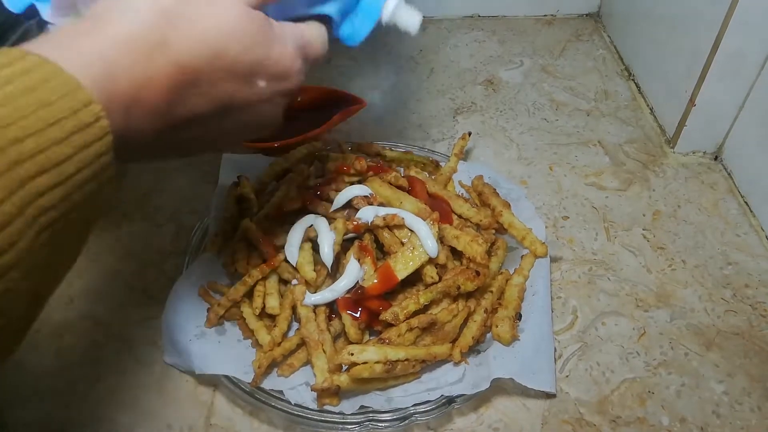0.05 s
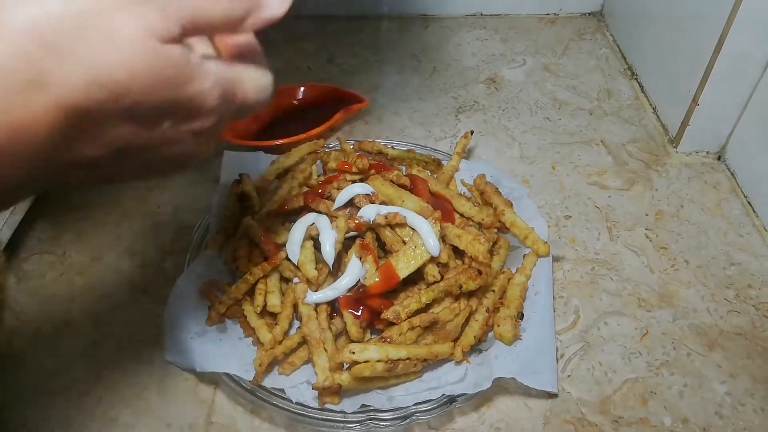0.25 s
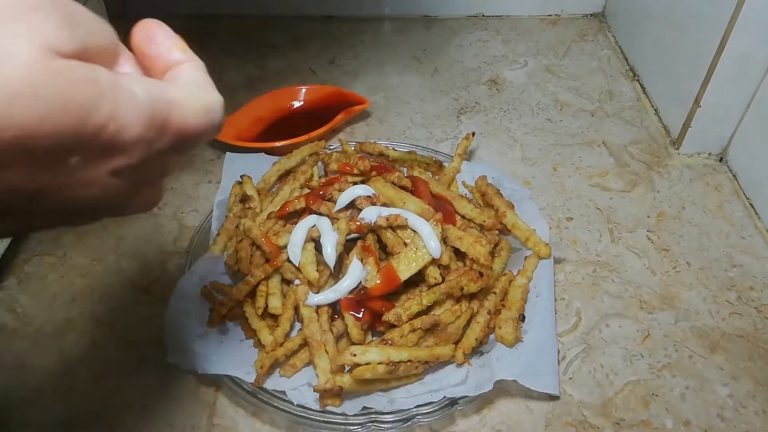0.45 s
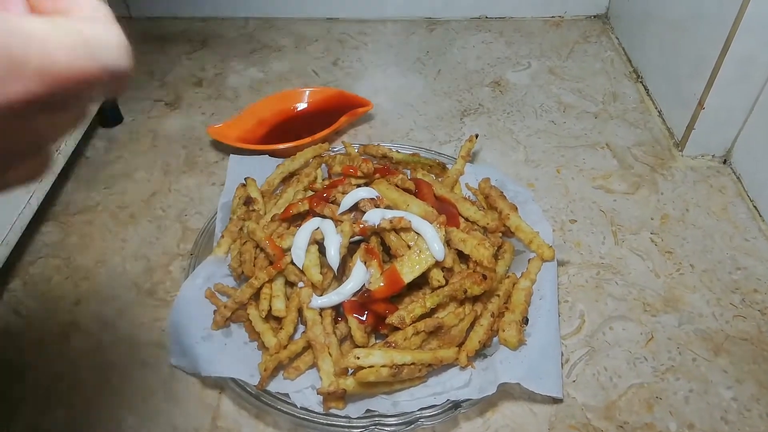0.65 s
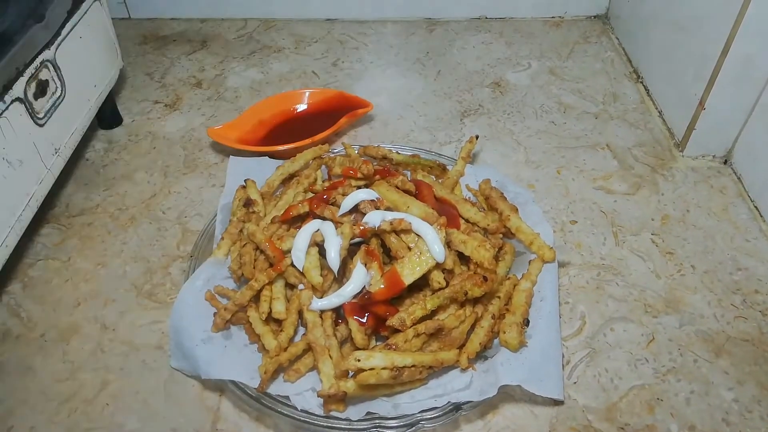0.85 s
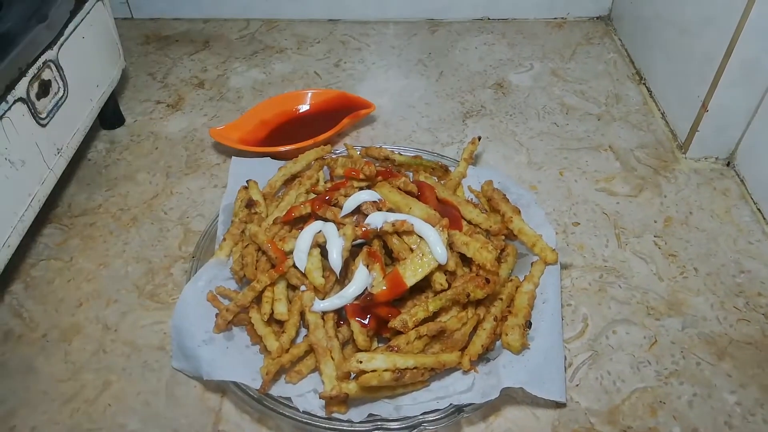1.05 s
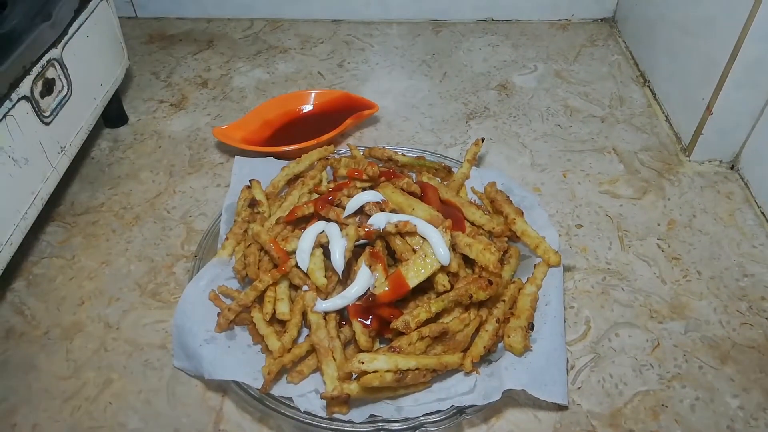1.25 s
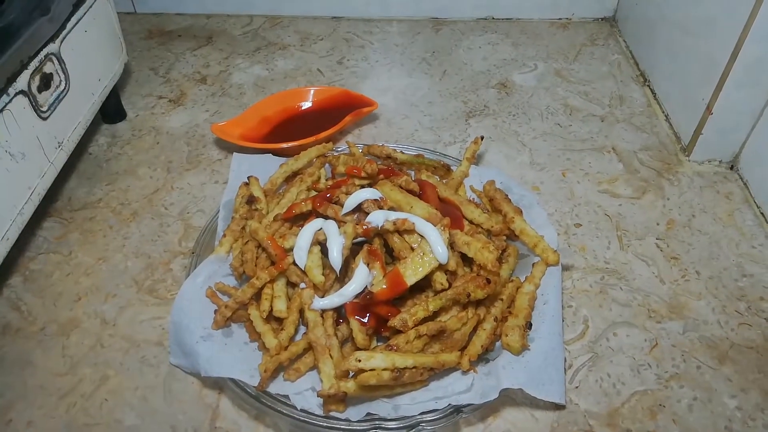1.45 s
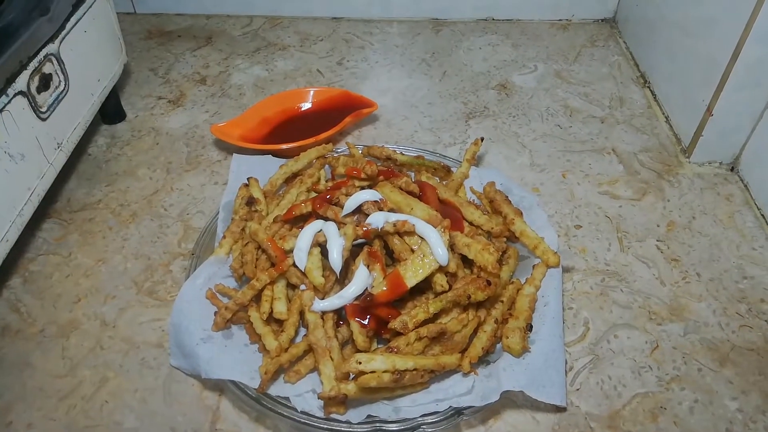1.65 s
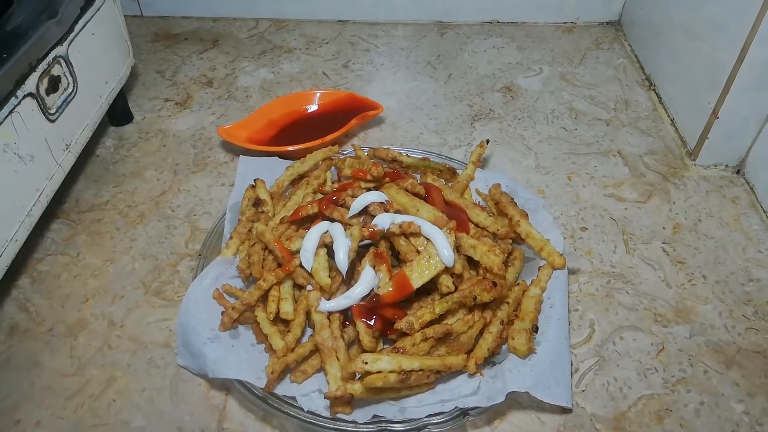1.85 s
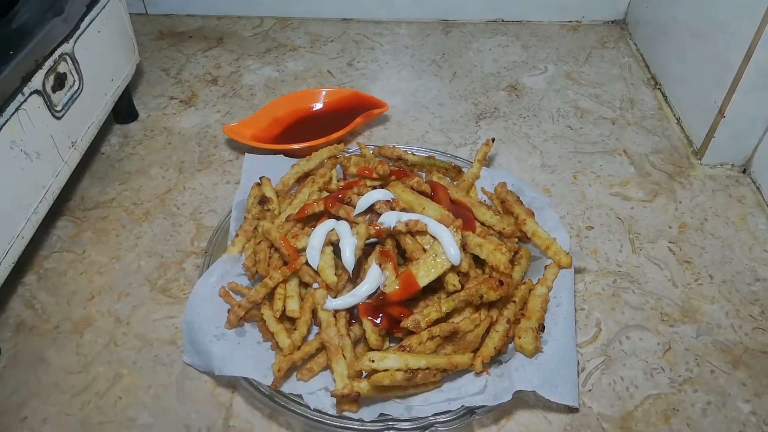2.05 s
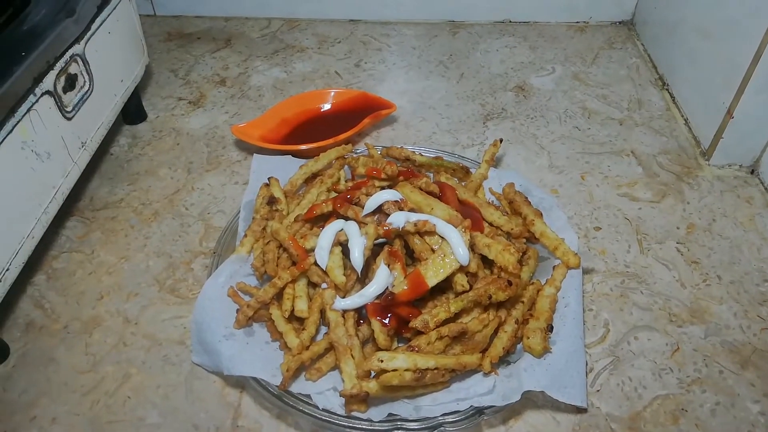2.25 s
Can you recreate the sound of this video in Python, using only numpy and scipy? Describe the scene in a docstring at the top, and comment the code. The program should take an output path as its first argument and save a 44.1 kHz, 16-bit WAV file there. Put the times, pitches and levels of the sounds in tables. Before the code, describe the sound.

A bottle is set down abruptly, knocking and booming on a hollow kitchen surface as a loose object rattles briefly. Afterwards, light ticks, crinkles and cloth brushing sit over low room tone, with dull handling thuds close on the left.

```python
"""A faint tick and a soft scuff, then a sauce bottle lands hard beside a plate in a small tiled kitchen.
It hits in a quick clatter of contacts; the hollow surface booms and a loose thing on it rocks to rest.
Afterwards come faint crinkles, clinks and cloth rustle over a low room tone,
and soft handling bumps close to the left microphone of the stereo pair."""
import sys
import numpy as np
from scipy import signal
from scipy.fft import rfft, irfft, next_fast_len
from scipy.io import wavfile

SR = 44100
rng = np.random.default_rng(int(sys.argv[2]) if len(sys.argv) > 2 else 0)


def generate_wav(sig):
    """Save sig (samples, or channels by samples) to the path in sys.argv[1] as 16-bit PCM at SR."""
    pcm = np.round(np.clip(np.atleast_2d(sig).T, -1, 1) * 32767).astype(np.int16)
    wavfile.write(sys.argv[1], SR, pcm)


N = 105840
T = np.arange(N) / SR


def from_db(db):
    """Decibels to gain."""
    return 10 ** (np.asarray(db) / 20)


def at_hz(points, hz):
    """Read a table on a log-frequency axis."""
    return np.interp(np.log(hz), np.log(np.array(points)[:, 0]), np.array(points)[:, 1])


def octaves(hz):
    """Octaves above the 3 kHz pivot of a brightness tilt, flat below 400 Hz."""
    return np.log2(np.maximum(hz, 400) / 3000)


def pan(left_minus_right_db):
    """Gains at the left and right microphones."""
    return from_db(np.array([[.5], [-.5]]) * left_minus_right_db)


def from_right(x, lag_s=0.0004695):
    """Sound from the right reaches the left microphone a little later."""
    return np.array([np.interp(T - lag_s, T, x[0]), x[1]])


def clicks(times, sizes):
    """Single-sample impulses."""
    return np.bincount((np.abs(times) * SR).astype(int), sizes, N)[:N] + 1e-18


def fade(energy, t60):
    """Energy that is put in dies away by 60 dB in t60 seconds."""
    return signal.lfilter([1], [1, -from_db(-120 / (t60 * SR))], energy)


def swell(x, seconds):
    """One-pole smoothing."""
    pole = np.exp(-1 / (seconds * SR))
    return signal.lfilter([1 - pole], [1, -pole], x)


def ring(strikes, hz, t60):
    """The motion of a damped mode driven by strikes."""
    pole = from_db(-60 / (t60 * SR)) * np.exp(2j * np.pi * hz / SR)
    return signal.lfilter([1], [1, -pole], strikes).imag


def causal(gain):
    """The minimum-phase filter with this gain, so that nothing sounds early."""
    cepstrum = irfft(np.log(gain))
    half = len(cepstrum) // 2
    return np.exp(rfft(np.r_[cepstrum[0], 2 * cepstrum[1:half], np.zeros(half)]))


# How alike the two microphones hear the kitchen: frequency_hz, correlation
MIC_LIKENESS = [(40, 0.2), (100, 1), (270, 0.99), (640, 0.46), (1400, 0.074)]
def banded_noise(colour, envelope):
    """Stereo noise of rms 1 in narrow bands, each then shaped by envelope(hz)."""
    edges = np.geomspace(22, 17000, 25)
    white = rng.standard_normal((2, 2, N))
    out = power = 0
    for k, (low, high) in enumerate(zip(edges, edges[1:])):
        band = signal.butter(2, [low, high], "band", fs=SR, output="sos")
        mid, side = signal.sosfilt(band, white[k % 2])
        hz = np.sqrt(low * high)
        alike, gain = at_hz(MIC_LIKENESS, hz), from_db(at_hz(colour, hz))
        stereo = np.sqrt(1 + alike) * mid + np.sqrt(1 - alike) * side * [[1], [-1]]
        out = out + gain * envelope(hz) * stereo
        power += 2 * gain ** 2 * (high - low) / (SR / 2)
    return out / np.sqrt(power)


# The quiet kitchen: frequency_hz, density_db
ROOM_COLOUR = [(25, -4.5), (69, 1.5), (140, -5), (523, -9.5), (1200, -20.5), (4150, -29), (15500, -29.5)]
# Its deepest rumble sits on the left microphone: frequency_hz, left_minus_right_db
ROOM_PAN = [(30, 22), (120, 0.5), (4000, 1)]
def room_tone(level_db=-52.5):
    """Steady low rumble and hiss."""
    return from_db(level_db) * banded_noise(ROOM_COLOUR, lambda hz: pan(at_hz(ROOM_PAN, hz)))


# Faint brushing, equally loud at both microphones: time_s, level_db
RUSTLE_LEVELS = [(.3, -54), (1.33, -62), (1.40, -53), (1.54, -53), (1.58, -45.5), (1.63, -56.5),
                 (1.96, -56), (2.03, -41.5), (2.065, -43.5), (2.11, -59)]
# Its colour: frequency_hz, density_db
RUSTLE_COLOUR = [(100, -40), (900, 8), (3000, 1.5), (4100, 7), (5000, 2), (16000, -1)]
def rustle(grain_db=0.51):
    """Cloth brushes softly, with a fine uneven grain."""
    grain = swell(rng.standard_normal(N), .003)
    level = from_db(np.interp(T, *np.transpose(RUSTLE_LEVELS)) + grain_db * grain / grain.std())
    return banded_noise(RUSTLE_COLOUR, lambda hz: level)


# Handling, close to the left microphone: start_s, level_db, pitch_hz
BUMPS = [(1.076, -33, 176), (1.125, -39, 131), (1.407, -37.5, 143), (1.719, -39, 238), (1.806, -34, 46.5),
         (1.821, -30.5, 150), (2.388, -34, 140)]
def bumps(t60_cycles=3.44, left_minus_right_db=23.5):
    """Dull thuds, each a low mode that dies within a few cycles."""
    thuds = sum(from_db(db) * ring(clicks([s], [1]), hz, t60_cycles / hz) for s, db, hz in BUMPS)
    return swell(thuds, 0.0005) * pan(left_minus_right_db)


# Small ticks to either side of the pair: start_s, level_db, tilt_db_per_octave, left_minus_right_db
TICKS = [(.069, -46.5, 2.5, -16), (0.938, -46.5, 3, 7), (1.273, -48, -1.5, 5.5), (1.578, -42, 2.5, -2),
         (1.651, -50.5, 3.5, -4), (1.6843, -33, -1.5, -0.5), (1.8075, -48, -8, 9), (1.8474, -34.5, 3, -6),
         (1.8589, -34, -2.5, -10), (1.98, -32.5, 1.5, -2), (2.0105, -31.5, 1.5, 1), (2.024, -29.5, 0, -8),
         (2.0514, -33, 1.5, -11)]
# Their colour: frequency_hz, density_db
TICK_COLOUR = [(100, -11.5), (1300, -2.5), (4500, -0.5), (8800, -4), (9800, 4), (11000, -4), (16000, -33.5)]
def crinkles(t60_s=0.031, snap_db=-3, snap_t60_s=0.00089, walls_db=-9.5, walls_t60_s=0.2):
    """Short ticks with a dry snap in front, each with a faint tail from the tiled walls."""
    start_s, level_db, tilt_db, side_db = np.transpose(TICKS)

    def envelope(hz):
        top_octaves = max(np.log2(hz / 6600), 0)  # the tilt is three times as steep up here
        sizes = from_db(level_db + tilt_db * (octaves(hz) + 2 * top_octaves))
        energy = np.array([clicks(start_s, side ** 2) for side in sizes * pan(side_db)])
        direct = fade(energy, t60_s) + from_db(snap_db) ** 2 * fade(energy, snap_t60_s)
        reflected = clicks(start_s, (sizes * from_db(walls_db)) ** 2)
        walls = swell(fade(reflected, walls_t60_s), 0.002)
        return np.sqrt(direct + walls)
    return banded_noise(TICK_COLOUR, envelope)


# The clinks that some ticks leave: start_s, level_db, pitch_hz
CLINKS = [(.937, -38.5, 4700), (1.273, -44, 4290), (1.8482, -35, 9600), (2.025, -27, 4230),
          (2.027, -28, 4030)]
def clinks(t60_s=0.039, lower_mode_ratio=0.89):
    """Brief bright rings of two modes each."""
    return sum(from_db(db) * ring(clicks([s], [.5]), hz * ratio, t60_s)
               for s, db, hz in CLINKS for ratio in (1, lower_mode_ratio))


# The first touch, centred between the microphones: pitch_hz, level_db, t60_s
TOUCH_MODES = [(626, -41, 0.045)]
def first_touch(start_s=0.12, rise_s=0.0063, fade_t60_s=0.7):
    """A soft hollow scuff just before the landing: noise drives a damped mode."""
    age = np.maximum(T - start_s, 0)
    envelope = (1 - np.exp(-age / rise_s)) * from_db(-60 * age / fade_t60_s)
    scuffs = [(db, ring(rng.standard_normal(N), hz, t60)) for hz, db, t60 in TOUCH_MODES]
    return envelope * sum(from_db(db) * scuff / scuff.std() for db, scuff in scuffs)


# Where the landing sits between the microphones: frequency_hz, left_minus_right_db
LANDING_PAN = [(260, 1.5), (700, -1.5), (1300, -0.5), (2400, -2.5), (4400, 6.5), (8100, -0.5)]
def struck_mode(start_s, force_db, hz, t60, build_cycles=0.7, jolt_rad=0.82, left_lag_s=0.00015):
    """A mode gathers energy from each contact, and its phase is jolted."""
    energy = fade(clicks(start_s, from_db(force_db) ** 2), t60)
    amplitude = np.sqrt(swell(energy, build_cycles / hz))
    jolts = clicks(start_s, jolt_rad * rng.standard_normal(len(start_s)))
    phase = 2 * np.pi * hz * (T - start_s[0]) + swell(np.cumsum(jolts), 1 / hz)
    mic_lag_rad = np.minimum(2 * np.pi * hz * left_lag_s, np.pi / 2) * np.array([[1], [0]])
    return pan(at_hz(LANDING_PAN, hz)) * amplitude * np.sin(phase - mic_lag_rad)


# A loose thing on the surface, jolted by the landing: start_s, level_db
ROCKS = [(.245, -21), (.392, -37), (0.4445, -31), (0.5148, -34.5), (.541, -38), (.607, -42.5),
         (.669, -44.5), (.733, -47.5), (0.762, -49), (.829, -50.5)]
# Its hollow ring: pitch_hz, level_db, t60_s
ROCK_MODES = [(503, -6, 0.19), (799, 2, 0.073), (991, -16, 0.45), (1644.5, -2.5, 0.15), (1860, -8.5, 0.23),
              (2470, -6, 0.089), (2840, -9.5, 0.16), (3460, -16.5, 0.34), (4150, -19, 0.47)]
def rocking():
    """The loose thing rocks to rest, each rock renewing its ring."""
    start_s, rock_db = np.transpose(ROCKS)
    return sum(struck_mode(start_s, rock_db + mode_db, hz, t60) for hz, mode_db, t60 in ROCK_MODES)


# The bottle landing beside the plate:
# start_s, clatter_db, tilt_db_per_octave, upper_edge_hz, push_db, favoured_pitch_hz
CONTACTS = [(0.2154, -17.5, 2, 9700, -1.5, 180), (0.2172, -11.5, 6.5, 6850, -6.5, 600),
            (0.2417, -11, 3, 7400, 0.5, 309), (.248, -18.5, -0.5, 7060, -4, 559),
            (0.257, -26, -5, 6100, -1.5, 160), (0.2805, -12.5, 0.83, 15000, -14, 358),
            (.3, -31.5, -4.5, 9000, 0.5, 261), (.315, -21.5, -3.5, 14300, -5.5, 584),
            (.348, -26, 1.7, 12000, -6.5, 233)]
# The ring of the hollow surface and the bottle: pitch_hz, level_db, t60_s
LANDING_MODES = [(165.9, -21, 0.075), (202.7, -24.5, 0.63), (265.5, -18, 0.61), (323.3, -15.5, 0.29),
                 (370.8, -24, 0.59), (490.5, -16, 0.28), (606.3, -14.5, 0.15), (2787, -24, 0.25),
                 (3660, -24, 0.099), (4486, -28, 0.29), (4827, -36, 0.31), (4990, -23.5, .18)]
def surface_boom(focus_db=14.5, focus_width_octaves=.3):
    """The weight comes down: low modes follow each push, high ones the clatter."""
    start_s, clatter_db, tilt_db, _, push_db, favoured_hz = np.transpose(CONTACTS)
    out = 0
    for hz, mode_db, t60 in LANDING_MODES:
        if hz < 2000:
            nearness = np.exp(-(np.log2(hz / favoured_hz) / focus_width_octaves) ** 2)
            force_db = push_db + focus_db * (nearness - 1)
        else:
            force_db = clatter_db - clatter_db.max() + tilt_db * octaves(hz)
        out = out + struck_mode(start_s, mode_db + force_db, hz, t60)
    return out


def weak_resonances(hz, depth_db=1, spacing_hz=70.5):
    """Many weak resonances ripple the colour of the struck things, less so below 1 kHz."""
    ripple = np.interp(hz / spacing_hz, np.arange(1000), rng.standard_normal(1000))
    return from_db(depth_db * (ripple * np.minimum(hz / 1000, 1) - .5))


# The clatter as it reaches the microphones: frequency_hz, density_db
CLATTER_COLOUR = [(50, -27), (100, -7), (330, 2.5), (780, 5), (1020, 3.5), (1400, -4.5), (1750, 0),
                  (4500, -0.5), (5800, 4.5), (6500, -5), (9000, -8.5), (12000, -17), (16000, -21)]
# How long it hangs in the kitchen: frequency_hz, t60_s
CLATTER_DECAY = [(100, 0.39), (500, 0.39), (2000, 0.45), (5000, .19), (14000, 0.25)]
def clatter(crack_db=8.5, crack_t60_s=0.0041, contact_s=0.00025, build_cycles=2.5):
    """Every contact and rock sets off the same crack and dense ring, brighter or duller."""
    def envelope(hz):
        impulse = clicks([0], [1])
        tail = fade(impulse, at_hz(CLATTER_DECAY, hz))
        crack = from_db(crack_db) ** 2 * fade(impulse, crack_t60_s)
        energy = swell(tail + crack, contact_s + build_cycles / hz)  # lows swell later
        return np.sqrt(energy) * pan(at_hz(LANDING_PAN, hz))
    size = 2 * next_fast_len(N // 2 + SR // 2)
    hz = np.arange(size // 2 + 1) * SR / size
    response = rfft(banded_noise(CLATTER_COLOUR, envelope), size) * causal(weak_resonances(hz))
    rattles = [(s, db - 3, -2.6, 14000) for s, db in ROCKS]  # same first four columns as CONTACTS
    blows = 0
    for start_s, level_db, tilt_db, edge_hz, *_ in CONTACTS + rattles:
        colour = from_db(level_db + tilt_db * octaves(hz)) / np.sqrt(1 + (hz / edge_hz) ** 6)
        blows = blows + rfft(clicks([start_s], [1]), size) * colour
    return irfft(response * blows, size)[:, :N]


def scene():
    """The kitchen at the stereo pair; the noisy and bright sounds reach the right microphone first."""
    body = first_touch() + surface_boom() + rocking() + bumps()
    return body + from_right(clatter() + crinkles() + clinks() + rustle() + room_tone())


def record(dry, ceiling=.92, cutoff_hz=15700):
    """The highest peaks are rounded and the top treble is cut."""
    rounded = dry / (1 + (dry / ceiling) ** 6) ** (1 / 6)
    return signal.sosfilt(signal.ellip(10, .1, 80, cutoff_hz, fs=SR, output="sos"), rounded)


dry = scene()
out = record(dry)
generate_wav(out)
```